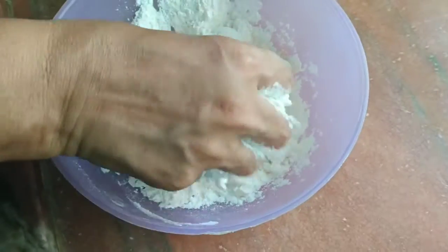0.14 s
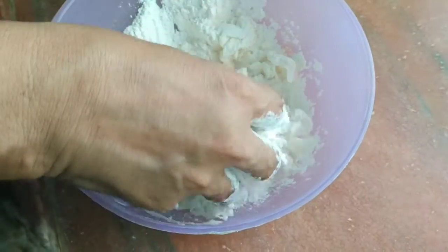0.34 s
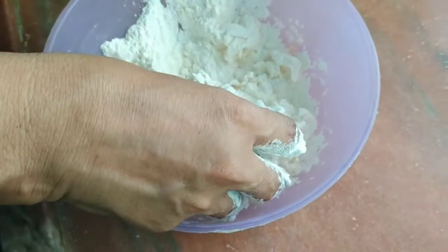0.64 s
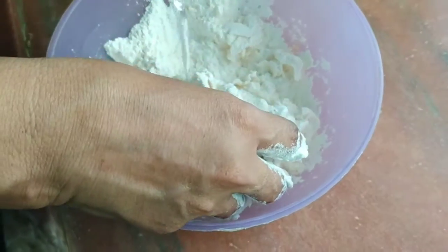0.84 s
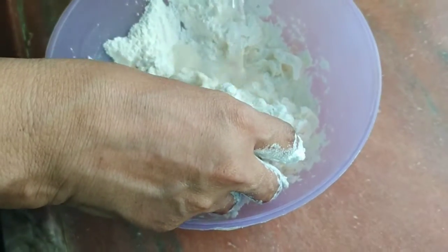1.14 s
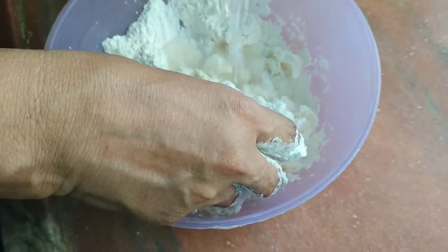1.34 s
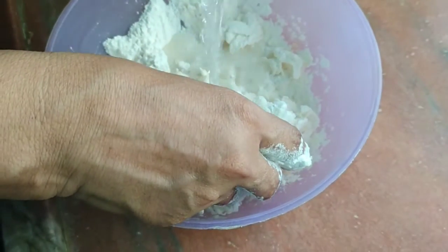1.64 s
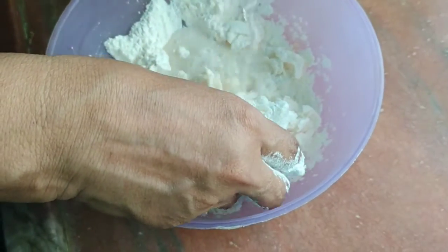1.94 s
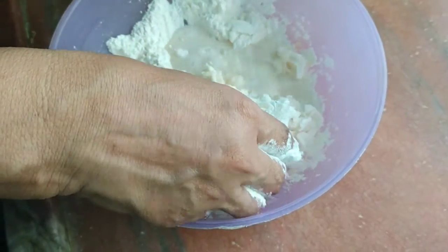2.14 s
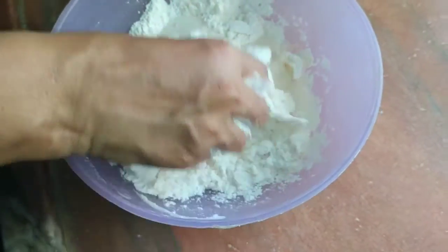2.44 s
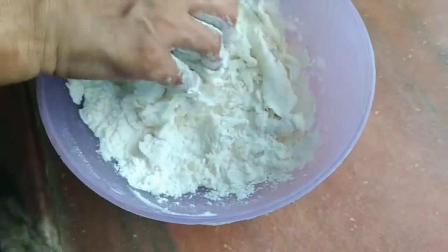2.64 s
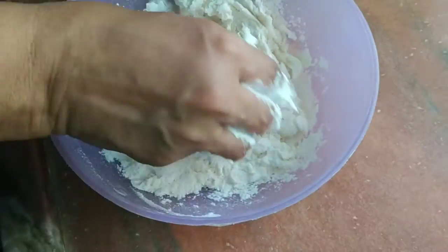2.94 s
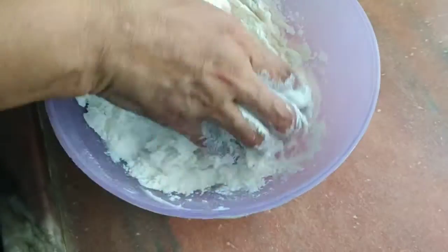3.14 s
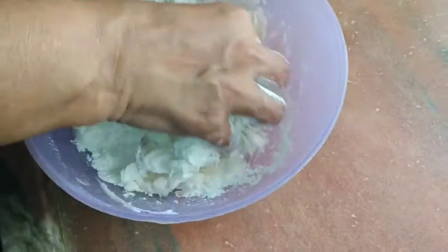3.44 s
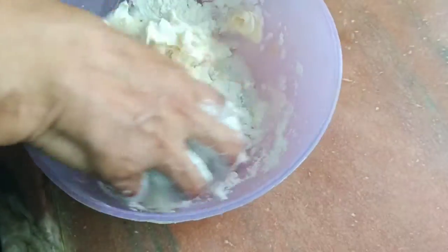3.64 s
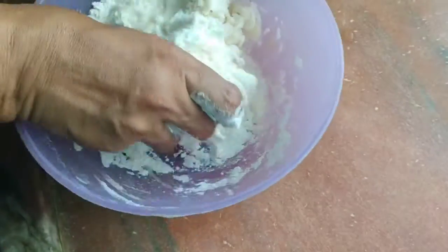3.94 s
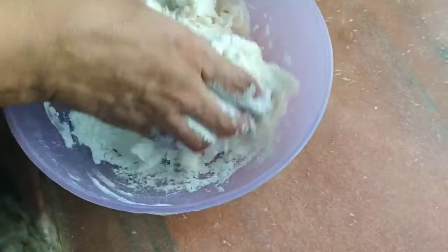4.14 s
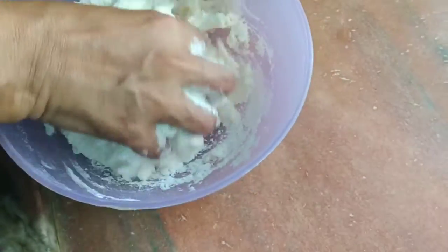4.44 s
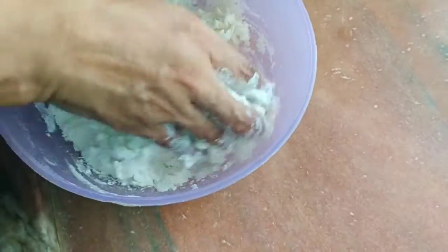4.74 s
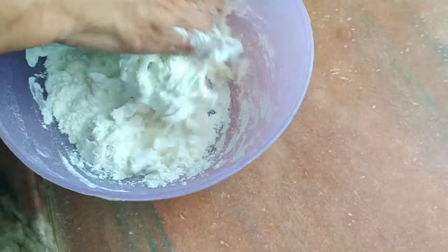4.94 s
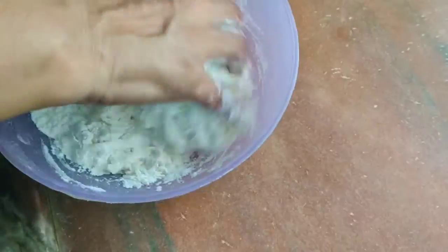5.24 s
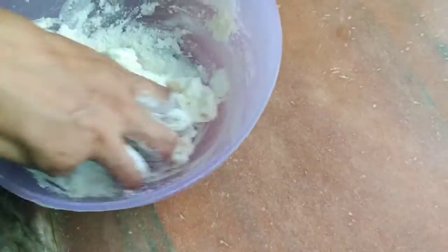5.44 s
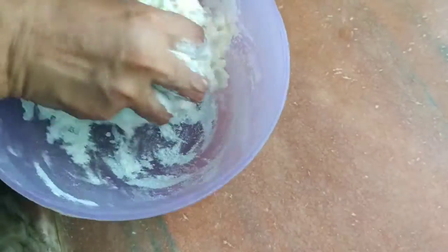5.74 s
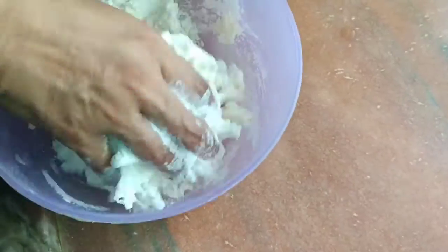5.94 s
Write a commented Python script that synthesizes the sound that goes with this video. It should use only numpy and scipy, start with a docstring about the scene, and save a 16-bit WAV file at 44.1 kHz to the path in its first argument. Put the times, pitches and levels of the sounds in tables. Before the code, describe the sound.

A hand mixes flour and water in a thin plastic bowl: quiet trickle, rocking knocks, then close gritty sweeps and several hollow clacks.

```python
"""On a hard floor in a quiet, live room, a hand mixes flour and water in a thin plastic bowl.
Random grains make the faint patter of water, and short noise bursts the ticks of wet dough.
The bowl rocks: decaying modes ring at each landing, and its base drums on the floor with a low drone.
Then fingers sweep hissing flour round the wall, heard close and without the room, and the pressed
bowl tips and clacks down several times. Rumble, far-off tones and a faint whine lie behind."""
import sys
import numpy as np
from scipy import signal
from scipy.fft import rfft, irfft
from scipy.io import wavfile

SR = 44100
rng = np.random.default_rng(int(sys.argv[2]) if len(sys.argv) > 2 else 0)


def wav_record(signal):
    """Record a signal, one row per channel, as 16-bit PCM in the file named by sys.argv[1]."""
    frames = np.transpose(np.atleast_2d(signal))
    bounded = np.clip(frames, -1, 1)
    # unit amplitude maps onto the largest positive 16-bit level
    quanta = np.round(bounded * 32767).astype(np.int16)
    wavfile.write(sys.argv[1], SR, quanta)


N = 269248
TIME = np.arange(N) / SR


def amp(db):
    """Decibels to gain."""
    return 10 ** (np.asarray(db) / 20)


def unit(x):
    """Scale to rms 1."""
    return x / np.sqrt(np.mean(x ** 2) + 1e-20)


def fade(t, t60):
    """Exponential decay by 60 dB in t60."""
    return np.exp(-np.log(1000) * t / t60)


def at_hz(points, hz):
    """Read a table on a log-frequency axis."""
    f, value = np.transpose(points)
    return np.interp(np.log(np.maximum(hz, 1)), np.log(f), value)


def colour(x, spectrum):
    """Give a signal a smooth spectrum."""
    size = x.shape[-1]
    gain = amp(at_hz(spectrum, np.fft.rfftfreq(size, 1 / SR)))
    return irfft(rfft(x) * gain, size)


def band(x, low_hz, high_hz):
    """Causal band-pass."""
    sections = signal.butter(2, [low_hz, high_hz], "band", fs=SR, output="sos")
    return signal.sosfilt(sections, x)


def spread(pair):
    """Mix two unrelated signals into left and right, most alike in the bass and apart in the treble."""
    # likeness of the two microphones: f/Hz, correlation (1 = alike)
    likeness = [(40, 0.21), (130, 1), (290, 0.79), (640, 0.48), (1400, -0.19), (3100, 0.08),
                (15000, 0.0041)]
    size = pair.shape[-1]
    alike = np.clip(at_hz(likeness, np.fft.rfftfreq(size, 1 / SR)), -.99, .99)
    mid, side = rfft(pair) * np.sqrt([(1 + alike) / 2, (1 - alike) / 2])
    return irfft([mid + side, mid - side], size)


def wander(per_s):
    """Slow random drift of rms 1, with per_s new values a second."""
    knots = rng.standard_normal(4096)
    return unit(np.interp(TIME * per_s, np.arange(len(knots)), knots))


def grains(per_s, size_db):
    """Random tiny clicks of uneven size, at the same instants in both channels."""
    born = rng.random(N) < per_s / SR
    sizes = amp(size_db * np.minimum(rng.exponential(1, N), 4))
    return born * sizes * rng.standard_normal((2, N))


def add(out, s, sound):
    """Mix a short stereo sound in at a time."""
    start = round(s * SR)
    out[:, start:start + sound.shape[-1]] += sound[:, :N - start]


def air(level_db=-49.5):
    """Steady far-off rumble and faint hiss: noise with a fixed spectrum."""
    # spectrum of the background: f/Hz, relative level/dB
    air_spectrum = [(28, 4), (40, -5), (55, -12.5), (100, -15), (140, -11.5), (220, -6.5), (300, -1.5),
                    (430, -9), (620, -10), (870, -11.5), (1400, -13.5), (2400, -18.5), (3600, -26.5),
                    (6500, -33), (10500, -27.5), (13000, -39), (16000, -70)]
    noise = spread(rng.standard_normal((2, N)))
    return amp(level_db) * unit(colour(noise, air_spectrum))


def far_tones(arch=.07, blur_per_s=110):
    """Distant tones rise and fall in a gentle arch of pitch and level, blurred by the walls."""
    # far-off tones: middle t/s, length t/s, top f/Hz, level before the blur/dB
    tones = [(0.151, 0.28, 2035, -62.5), (.17, .33, 1900, -66), (.78, 0.27, 2060, -62),
             (.81, 0.32, 1894, -62), (.895, 0.222, 520, -54)]
    out = np.zeros((2, N))
    for s, length, hz, db in tones:
        along = np.clip(2 * (TIME - s) / length, -1, 1)
        tone = np.exp(2j * np.pi * np.cumsum(hz * (1 - arch * along ** 2)) / SR)
        blur = np.array([wander(blur_per_s) + 1j * wander(blur_per_s) for _ in range(2)])
        out += amp(db) * np.cos(np.pi * along / 2) * (tone * blur).real
    return out


def whine(hz=858, level_db=-67, waver=0.0061):
    """A faint background tone of slightly wavering pitch comes and goes, differently on each side."""
    phase = 2 * np.pi * np.cumsum(hz * (1 + waver * wander(per_s=12))) / SR
    swell = np.array([1 + wander(per_s=4) / 2 for _ in range(2)])
    return amp(level_db) * np.sin(phase) * swell


def room(x, near_db=-7, near_t60=0.076, near_gap_s=0.0035, wall_gap_s=0.014, floor_db=-9, floor_t60=0.11):
    """Arm and floor soon scatter the treble and the middle; then a diffuse tail dies band by band."""
    # decay of the room: f/Hz, t60/s
    tail_t60 = [(150, 1.02), (400, 0.03), (900, 0.6), (3000, 0.3), (10000, 0.6)]
    # strength of its tail: f/Hz, relative level/dB
    tail_db = [(120, -8), (200, -11.5), (330, -10), (500, -5.5), (850, -8), (1400, -16), (3000, -11),
               (10000, -11.5)]
    t = TIME[:SR]
    white = [spread(rng.standard_normal((2, SR))) for _ in range(2)]

    near = rng.standard_normal((2, SR)) * fade(t, near_t60) * (t > near_gap_s)
    response = amp(near_db) * band(unit(near) / np.sqrt(SR), low_hz=1660, high_hz=14100)
    bounces = spread(rng.standard_normal((2, SR))) * fade(t, floor_t60) * (t > near_gap_s)
    response += amp(floor_db) * band(unit(bounces) / np.sqrt(SR), low_hz=338, high_hz=1180)

    edges = 90 * 2 ** np.arange(0, 8, .5)  # half-octave bands
    for k, (low, high) in enumerate(zip(edges, edges[1:])):
        hz = np.sqrt(low * high)
        tail = fade(t, at_hz(tail_t60, hz)) * np.clip(t / wall_gap_s - 1, 0, 1)
        tail /= np.sqrt(np.sum(tail ** 2))
        response += amp(at_hz(tail_db, hz)) * band(white[k % 2], low, high) * tail
    return x + signal.fftconvolve(x, response, axes=1)[:, :N]


def water(fade_t60=5.7):
    """A thin stream patters on soft flour: many small bright grains under a changing level."""
    # patter of the stream: t/s, level/dB
    pour = [(.9, -84), (1.05, -68), (1.15, -57), (1.33, -70), (1.46, -60), (1.63, -70), (1.82, -62.5),
            (2.0, -63.5)]
    s, db = np.transpose(pour)
    outside_s = abs(TIME - np.clip(TIME, s[0], s[-1]))
    # the level fades in before the curve and out after it
    flow = amp(np.interp(TIME, s, db)) * fade(outside_s, fade_t60)
    return flow * unit(band(grains(per_s=920, size_db=3.0), low_hz=7640, high_hz=12300))


def drips(width=1.31, level_db=3):
    """Tiny wet films of water and dough burst with a short bright tick."""
    # wet ticks: t/s, relative peak level/dB, centre f/Hz, t60/s of the burst before its filters
    wet_ticks = [(0.364, -42.5, 8100, .016), (.399, -46, 7800, 0.023), (0.619, -38, 8000, 0.019),
                 (.957, -48.5, 9100, .02), (1.094, -44, 9300, .012), (1.116, -42, 9400, 0.016),
                 (1.124, -41, 9500, .008), (1.136, -43, 9800, .01), (1.159, -37, 9300, 0.015),
                 (1.194, -38, 9450, .012), (1.252, -42, 8600, 0.033), (1.460, -39, 10900, 0.048),
                 (1.540, -44.5, 11300, 0.024), (1.704, -43, 11000, 0.023), (1.798, -42, 8600, 0.03),
                 (2.006, -38, 8800, 0.035), (2.024, -48, 6200, 0.014), (2.048, -18.5, 9500, 0.011),
                 (2.083, -36, 9500, .015), (2.179, -39, 9500, 0.046), (3.057, -41, 10000, 0.045)]
    out, t = np.zeros((2, N)), TIME[:SR // 20]
    for s, db, hz, t60 in wet_ticks:
        burst = rng.standard_normal((2, len(t))) * fade(t, t60)
        tick = band(burst, hz / width, hz * width)
        tick = band(tick, low_hz=2980, high_hz=12800)
        add(out, s, amp(db + level_db) * tick / np.abs(tick).max())
    return out


def crumbs(count=10, per_s=130, size_db=0.3):
    """Small lumps break with ticks spread over many pitches."""
    edges = np.geomspace(1700, 12000, count + 1)
    ticks = [band(grains(per_s, size_db), low, high) / np.sqrt(low) for low, high in zip(edges, edges[1:])]
    return unit(sum(ticks))


def strokes(attack_s=0.047, build_db_per_s=17, release_t60=0.55):
    """Each stroke digs in, presses harder and lets go: gains of loose flour and of rubbing."""
    # finger strokes: start t/s, length t/s, relative level/dB of loose flour, of rubbing on the wall
    sweeps = [(2.41, 0.12, -60.5, -57.5), (2.628, 0.037, -55.5, -75), (3.028, 0.28, -48.5, -54.5),
              (3.266, 0.066, -46, -47.5), (3.49, 0.3, -45.5, -50.5), (3.866, 0.032, -46.5, -46.5),
              (3.94, 0.09, -50, -52.5), (4.208, 0.23, -46.5, -46), (4.456, 0.16, -58, -53.5),
              (4.717, 0.14, -48.5, -54.5), (4.873, 0.19, -45, -47), (5.15, 0.32, -44, -50),
              (5.383, 0.26, -44.5, -46.5), (5.713, 0.044, -44.5, -42.5), (5.962, 0.076, -50.5, -42)]
    power = np.zeros((2, N))
    for s, length, loose_db, rub_db in sweeps:
        age = TIME - s
        dig = np.clip(age / attack_s, 0, 1)
        # pressure builds as flour heaps up before the fingers
        press = amp(build_db_per_s * np.minimum(age - length, 0))
        release = fade(np.maximum(age - length, 0), release_t60)
        power += (amp([[loose_db], [rub_db]]) * dig * press * release) ** 2
    return np.sqrt(power)


def fingers(flour_db=-1, crumb_db=-8, rub_db=-1, slip_db=0.5, patchy_db=3.0):
    """Flour grains hiss as they shear, crumbs break, dough rubs the wall; all stick and slip together."""
    # hiss of the flour: f/Hz, relative level/dB
    flour_spectrum = [(300, -48), (1200, -38), (2800, -12), (4200, -13.5), (6300, -14), (8500, -8.5),
                      (10200, -7), (11500, -9), (13000, -16.5), (15500, -28)]
    # dough rubbing on the wall: f/Hz, relative level/dB
    rub_spectrum = [(60, -17), (130, -5), (300, -1), (550, -2), (900, -2), (1500, -3.5), (2600, -6.5),
                    (5000, -20), (12000, -88)]
    loose, pressed = strokes()
    slip = amp(slip_db * wander(per_s=52))
    shear = colour(grains(per_s=22000, size_db=3.0), flour_spectrum)

    # clumps of different size pass under the fingers, so each band of the hiss comes and goes
    clumps = np.zeros((2, N))
    edges = np.geomspace(600, 16000, 11)
    for k, (low, high) in enumerate(zip(edges, edges[1:])):
        sign = (-1) ** k  # keeps neighbouring bands from cancelling where they meet
        clumps += sign * band(shear, low, high) * amp(patchy_db * wander(per_s=40))
    hiss = amp(flour_db) * unit(clumps)

    rub = amp(rub_db) * unit(colour(spread(grains(per_s=13000, size_db=2.0)), rub_spectrum))
    return slip * (loose * (hiss + amp(crumb_db) * crumbs()) + pressed * rub)


def rolls(hz=170, waver=0.0387, upper_hz=217, upper_db=-7, grit_db=-13, uneven_db=1.0,
          swell_s=0.0053, release_t60=0.13):
    """The base judders on the floor at its drum pitch, stirs the next mode up and grinds over grit."""
    # rolling after a landing: start t/s, length t/s, relative level/dB
    drones = [(2.054, 0.04, -24), (2.13, 0.017, -47), (2.212, 0.093, -27), (2.308, 0.063, -29),
              (2.425, 0.021, -56), (2.525, 0.085, -49.5)]
    out = np.zeros((2, N))
    phase = 2 * np.pi * np.cumsum(1 + waver * wander(per_s=70)) / SR  # for 1 Hz
    upper = amp(upper_db) * wander(per_s=30) * np.sin(upper_hz * phase)
    grit = spread(grains(per_s=900, size_db=0.5))
    grit = amp(grit_db) * unit(band(grit, low_hz=222, high_hz=520))
    pressure = amp(uneven_db * wander(per_s=72))
    for s, length, db in drones:
        age = TIME - s
        envelope = np.clip(age / swell_s, 0, 1) * fade(np.maximum(age - length, 0), release_t60)
        judder = np.sin(hz * (phase - np.interp(s, TIME, phase)))
        out += amp(db) * envelope * (judder * pressure + upper + grit)
    return out


def bowl_modes(travel_s=0.0042, swell_cycles=0.35, wide_hz=800, widest=1.32):
    """The ring of every mode of the bowl at both microphones, as a complex tone."""
    # modes of the bowl with dough in it: f/Hz, relative level/dB
    modes = [(102, -4.5), (171, -1), (216, -1.5), (266, -4), (330, -1.5), (390, -11.5), (440, -13.5),
             (483, -0.5), (540, -19.5), (606, -7), (642, -9.5), (740, -3.5), (790, -8), (824, -2.5),
             (889, -3.5), (981, -4.5), (1062, -1.5), (1094, -16.5), (1215, -3.5), (1298, -4.5), (1397, -9),
             (1480, -9), (1605, -11), (1937, -7), (2220, -3)]
    # decay of the modes before the landing chokes them: f/Hz, t60/s
    mode_t60 = [(102, 0.48), (171, 0.27), (270, 0.2), (500, 0.083), (950, 0.085), (1500, 0.039),
                (2000, 0.046)]
    t = TIME[:SR // 2]
    hz, mode_db = np.transpose(modes)[:, :, None]
    swell = 1 - np.exp(-hz * t / swell_cycles)
    envelope = amp(mode_db) * swell * fade(t, at_hz(mode_t60, hz))
    # bending waves are dispersive: 1 kHz crosses the wall in travel_s, lower tones take longer
    phase = 2 * np.pi * (hz * t - 2 * travel_s * np.sqrt(hz * 1000))
    # high modes radiate in lobes, so the two sides hear them out of step (radians)
    lobe = (-1) ** np.arange(len(modes))[:, None]
    apart = lobe * np.minimum((hz / wide_hz) ** 2, 1) * widest / 2
    return hz, np.array([envelope * np.exp(1j * (phase + side * apart)) for side in (1, -1)])


def spot_ring(hz, t60=0.072, swell_s=0.0059, stretch=0.2, relax_s=0.004):
    """The patch that lands is dented: it rings briefly and sinks to hz as it relaxes."""
    t = TIME[:SR // 5]
    cycles = hz * (t + stretch * relax_s * (1 - np.exp(-t / relax_s)))
    swell = 1 - np.exp(-(t / swell_s) ** 2)
    return np.tile(np.sin(2 * np.pi * cycles) * swell * fade(t, t60), (2, 1))


def wall_snap(hz, stretch=0.39, glide_s=0.0013, t60=0.011, lag_s=.00007, width=2.0):
    """The thin wall flexes in a few quick cycles that fall to hz; the right side hears it first."""
    age = np.maximum(TIME[:SR // 20] - [[lag_s], [0]], 0)
    cycles = hz * (age + stretch * glide_s * (1 - np.exp(-age / glide_s)))
    return band(np.sin(2 * np.pi * cycles) * fade(age, t60), hz / width, hz * width)


def edge_tick(lag_s=.00005):
    """The stiff edge of the base rings for a few milliseconds as it hits the floor, right side first."""
    # tones of the edge: f/Hz, relative level/dB, t60/s
    edge_tones = [(2237, 3, 0.014), (2840, 2.5, 0.012), (4480, -5.5, 0.012)]
    age = np.maximum(TIME[:SR // 20] - [[lag_s], [0]], 0)
    return sum(amp(db) * np.sin(2 * np.pi * hz * age) * fade(age, t60) for hz, db, t60 in edge_tones)


def landings():
    """Thuds on the flat base and clacks on the edge, as one list of contacts."""
    # the bowl rocks and its flat base meets the floor: t/s, strength level/dB, contact sharpness f/Hz,
    # landing spot's settled f/Hz and level re strength/dB, wall snap's settled f/Hz and level re strength/dB
    base_thuds = [(2.038, -19, 980, 264, 12, 752, 1.5), (2.0472, -30.5, 804, 450, 7, 740, -17),
                  (2.2, -23, 930, 227, 1, 685, 5.5), (2.2073, -31.5, 1000, 627, 5, 860, 7),
                  (2.2602, -32, 1000, 603, 8.5, 736, 9.5), (2.2977, -32, 1000, 312, 0, 740, 1),
                  (2.345, -38, 555, 320, 8, 550, -10), (5.652, -32, 90, 74, -5, 300, -25)]
    # the tipped bowl lands on its edge: t/s, strength level/dB, contact sharpness f/Hz,
    # the hand damps modes below f/Hz, landing spot's settled f/Hz and level re strength/dB,
    # wall snap's settled f/Hz, then snap, crack and edge tick levels re strength/dB
    edge_clacks = [(3.558, -40.5, 1420, 306, 330, 6.6, 1210, 1, -14, -10),
                   (3.5942, -36, 1630, 337, 360, 1, 1210, 5, -7, -12),
                   (4.0976, -16.5, 2300, 517, 485, 1.5, 1336, 8.5, 0, -7.5),
                   (4.1082, -26, 1700, 600, 890, 6.1, 1250, -1, -12, -18),
                   (4.5750, -29.5, 2000, 560, 900, 3.4, 1300, 6, -11.5, -7),
                   (5.4379, -22.5, 2200, 306, 482, 0.73, 1330, 5, -4, -2.5),
                   (5.9836, -20, 2420, 524, 876, 6.2, 1336, 7.5, -2, -7.5)]
    base_damped_hz = 122  # the dough damps the base's modes below this
    crack_db, tick_db = -17, -22  # the flat base hardly cracks or ticks: re strength
    # cycles to choke by 60 dB: flat on the floor the bowl is choked, on its edge it rings freely
    thud_cycles, clack_cycles = 78, 500
    contacts = []
    for s, db, sharp_hz, *rings in base_thuds:
        contacts.append((s, db, sharp_hz, base_damped_hz, *rings, crack_db, tick_db, thud_cycles))
    return contacts + [(*clack, clack_cycles) for clack in edge_clacks]


def knocks(ring_db=-2.0, uneven_db=3.0, scatter_hz=600, crack_t60=.019):
    """Each landing rings the bowl and the spot it lands on, snaps the wall, cracks and ticks the edge."""
    # crack of a landing: f/Hz, relative level/dB
    crack_spectrum = [(150, -48), (800, -36), (1600, 0.5), (3000, 10), (4000, -4), (5300, 2), (7500, -3),
                      (10500, 0.5), (13000, -5), (16000, -59)]
    out, t = np.zeros((2, N)), TIME[:SR // 10]
    hz, rings = bowl_modes()
    contacts = landings()
    chance = rng.standard_normal((len(contacts), 2, len(hz), 1))
    for contact, (luck, turn) in zip(contacts, chance):
        s, db, sharp_hz, damped_hz, spot_hz, spot_db, snap_hz, snap_db, crack_db, edge_db, cycles = contact
        # modes above the sharpness or below the damping are struck weakly
        reach = 1 / np.sqrt((1 + (hz / sharp_hz) ** 5) * (1 + (damped_hz / hz) ** 5))
        # the lump of dough lies differently each time and throws the shorter waves out of step
        scatter = np.exp(1j * turn * np.minimum((hz / scatter_hz) ** 2, 1))
        strength = amp(db + ring_db + uneven_db * luck) * reach * scatter
        choke = fade(TIME[:rings.shape[-1]], cycles / hz)
        add(out, s, (choke * (strength * rings).imag).sum(axis=1))
        add(out, s, amp(db + spot_db) * spot_ring(spot_hz))
        add(out, s, amp(db + snap_db) * wall_snap(snap_hz))
        add(out, s, amp(db + edge_db) * edge_tick())
        crack = unit(colour(rng.standard_normal((2, len(t))), crack_spectrum)) * fade(t, crack_t60)
        add(out, s, amp(db + crack_db) * band(crack, low_hz=694, high_hz=15900))
    return out


def scene():
    """Bowl and water ring in the room; the close fingers and the background stay outside its echo."""
    background = air() + far_tones() + whine()
    in_room = room(water() + drips() + rolls() + knocks())
    return background + in_room + fingers()


def record(dry):
    """The right microphone dips near 13 kHz; the deepest rumble and the top are cut on both."""
    # right microphone: f/Hz, gain level/dB
    right_port = [(10500, 0.5), (13000, -7), (16000, 10)]
    heard = np.array([dry[0], colour(dry[1], right_port)])
    heard = band(heard, low_hz=30, high_hz=19800)
    steep_cut = signal.ellip(10, .1, 80, 15750, fs=SR, output="sos")  # low-pass at 15750 Hz
    return signal.sosfilt(steep_cut, heard)


dry = scene()
out = record(dry)
wav_record(out)
```